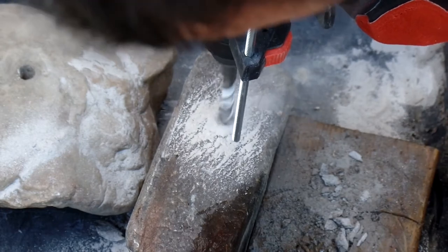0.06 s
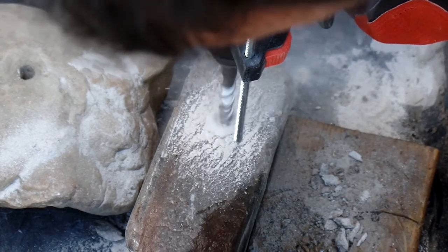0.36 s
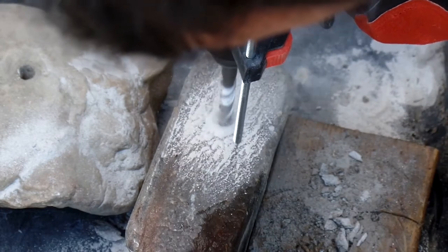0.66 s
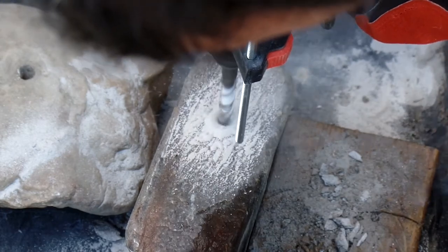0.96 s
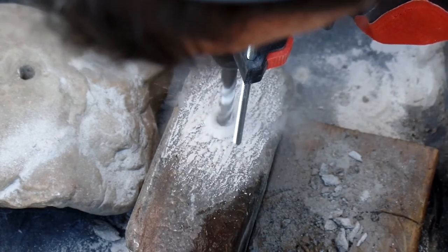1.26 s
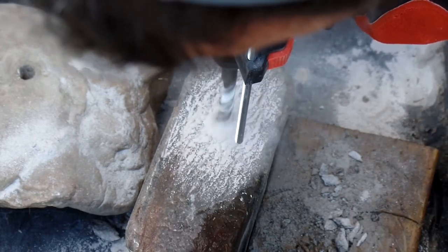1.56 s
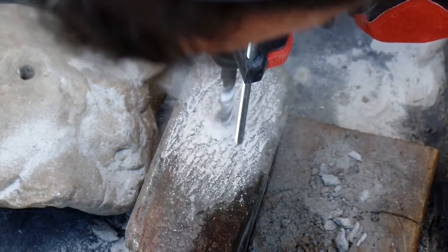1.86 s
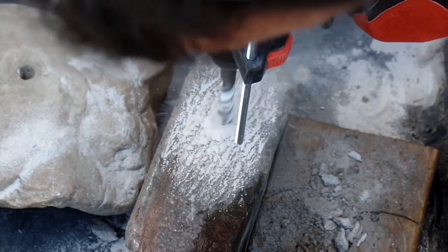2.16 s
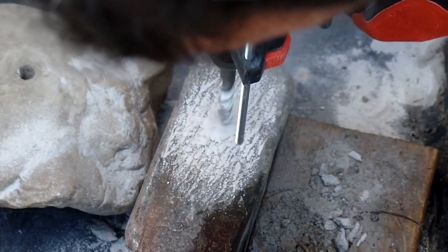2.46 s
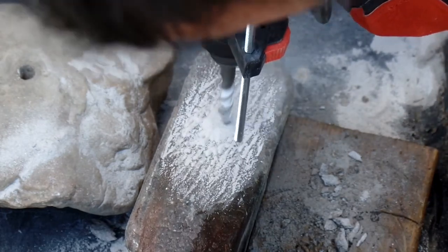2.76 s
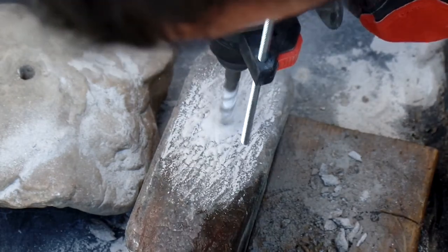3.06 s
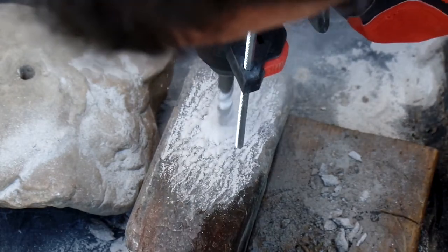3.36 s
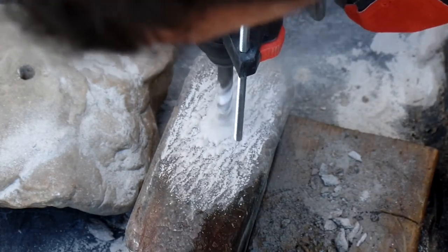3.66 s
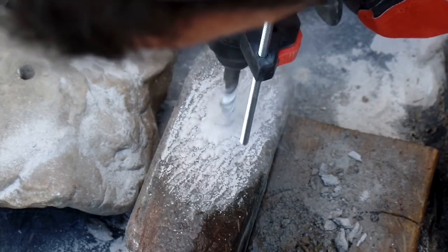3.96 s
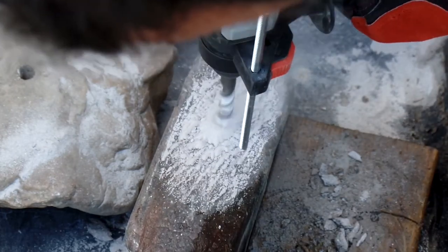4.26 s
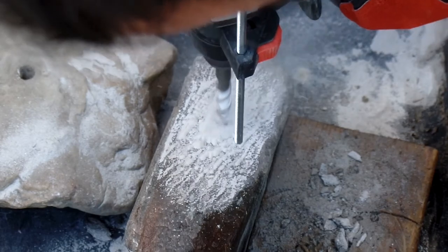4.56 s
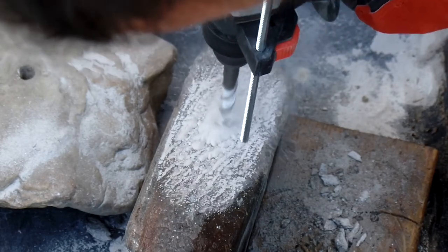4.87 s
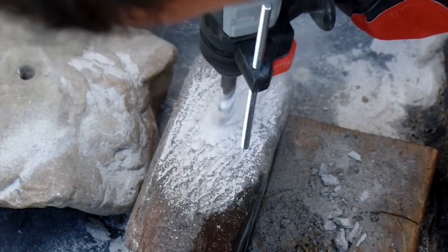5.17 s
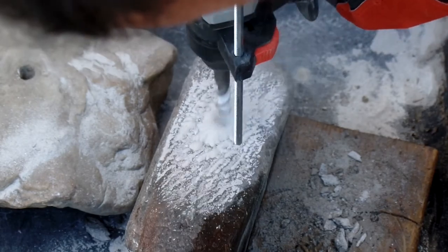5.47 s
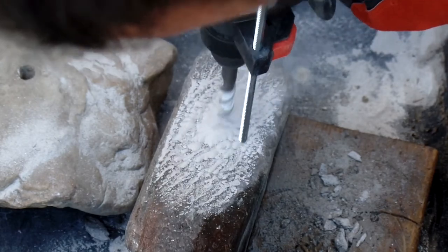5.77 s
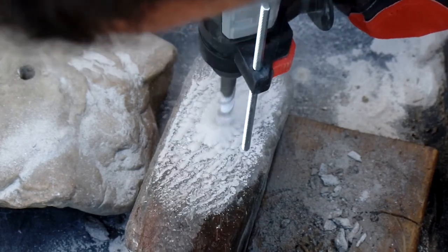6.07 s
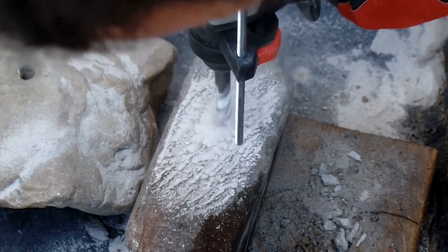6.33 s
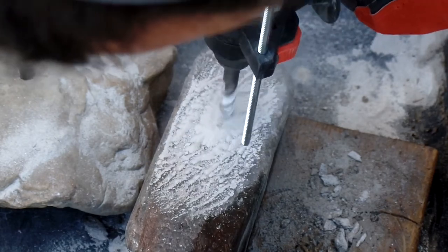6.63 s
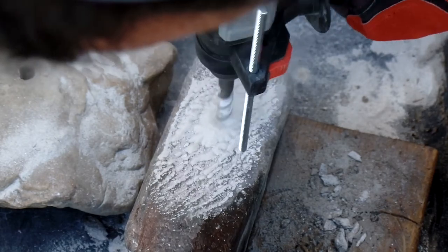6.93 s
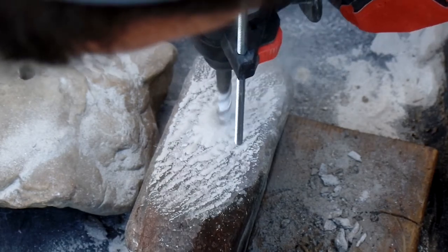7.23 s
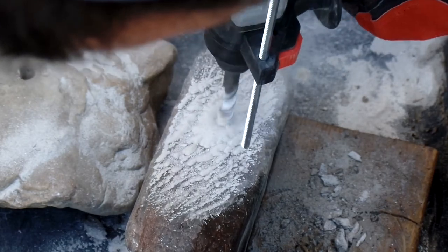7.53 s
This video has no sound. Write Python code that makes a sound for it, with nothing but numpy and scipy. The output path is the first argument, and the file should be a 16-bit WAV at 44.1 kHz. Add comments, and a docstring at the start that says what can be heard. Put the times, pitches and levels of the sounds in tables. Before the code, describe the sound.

A rotary hammer drill bores into a block of rock outdoors, close to the microphone. Very fast blows merge into a harsh, buzzing rattle, with a bright ring from the steel bit, gritty crushing of stone and a steady motor whine. The drilling softens briefly a few times as the tip slips and catches again. In the second half the whine swells and fades about once a second, and the drill never stops.

```python
"""Out of doors, close by, a rotary hammer drill bores into a block of rock.
The motor whines and drives a striker about 68 times a second; each impact excites the modes of rock
and housing, rings the steel bit and crushes stone. The flutes grind dust, and the blows soften
whenever the tip slips. Once the drill starts to rock in the hole, its whine swells and fades.
The blows leave a short, dull echo, and the air rumbles faintly beneath it all."""
import sys
import numpy as np
from scipy import signal
from scipy.fft import rfft, irfft, next_fast_len
from scipy.io import wavfile
from scipy.ndimage import uniform_filter1d

SR = 44100
rng = np.random.default_rng(int(sys.argv[2]) if len(sys.argv) > 2 else 0)


def wrap_up_sound(samples):
    """Save the sound to the file named by the first command line argument, as 16-bit audio."""
    columns = np.atleast_2d(samples).T
    # keep every value between -1 and 1, then stretch to whole-number steps
    tamed = np.clip(columns, -1, 1)
    steps = np.round(tamed * 32767).astype(np.int16)
    wavfile.write(sys.argv[1], SR, steps)


N = 335160
T = np.arange(N) / SR

# Motor speed, sagging under load. Each row: time in seconds, shaft speed in Hz.
SHAFT_SPEED = [(0.0, 367.4), (0.28, 369.9), (0.78, 365.2), (1.09, 368.4), (2.24, 365.3), (2.69, 366.1),
               (3.15, 370.3), (3.68, 366.8), (4.05, 371.8), (4.27, 368.6), (4.75, 369.5), (5.0, 373.8),
               (5.46, 369.2), (5.9, 374.6), (6.39, 370.2), (6.66, 372.6), (6.93, 371.2), (7.6, 374.1)]
# Weak motor harmonics. Each row: multiple of the shaft speed, level in dB.
HUM_HARMONICS = [(1, -92), (2, -62.5), (3, -76), (6, -63.5), (7, -63.5)]
# Modes of rock and housing. Each row: frequency in Hz, bandwidth in Hz, gain in dB.
BODY_MODES = [(135, 29, -23.5), (202, 52, -10), (338, 35, -35), (409.5, 28, -4.5), (468.7, 29, -0.5),
              (690, 50, 0.5), (816, 93, -1), (879, 64, 4), (956, 100, -8.5), (1178, 90, 4),
              (1314, 176, 2.5), (1465, 89, -3), (1768, 115, -1.5), (2074, 97, 3.5), (2560, 146, 1.5)]
# Modes of the steel bit. Each row: frequency in Hz, bandwidth in Hz, gain in dB,
# change once sunk in dB, spread between strokes in dB.
BIT_MODES = [(2780, 200, -6, 0, .4), (3300, 170, -8, 4, .5), (4180, 200, 1.2, 0, .4),
             (4700, 340, 1.3, 0, .4), (5560, 200, -13, -2, .6), (8260, 200, -8, 7.5, 2.8),
             (9100, 260, -12, -1, 1.5), (10000, 220, -5, -7, 1.5), (13200, 280, -11, 6, 2.2),
             (13850, 290, -7, 3, 2.2), (14850, 340, -9, -2, 1.8)]
# Stone crushed under the tip. Each row: frequency in Hz, relative spectral density in dB.
CRUSH_SPECTRUM = [(250, -19.5), (700, -13), (1500, -3), (2600, -3), (5000, 0.5), (6300, 1), (8000, 5.5),
                  (9500, -3), (12300, -1), (13600, 4), (15800, -9)]
# Fan, gears and dust in the flutes. Each row: frequency in Hz, relative spectral density in dB.
GRIND_SPECTRUM = [(50, -19.5), (250, -11), (450, -4), (750, -0.5), (1000, 1), (1400, 2.5), (1850, -1),
                  (2700, 2), (3700, 0), (5300, -2), (8000, -5.5), (10000, -11), (12300, -9), (13800, -17),
                  (15800, -7.5)]
# Outdoor air. Each row: frequency in Hz, relative spectral density in dB.
AIR_SPECTRUM = [(20, -22), (45, 6), (70, -15), (110, -10), (300, 8), (2000, -42)]
# The tip snags on hard grains. Each row: peak time in seconds, half-width in seconds, relative strength.
GRAIN_SNAGS = [(.3, .04, 1.0), (2.22, .02, 1), (2.94, 0.019, 1), (3.645, .015, 6), (3.865, 0.013, 3),
               (6.02, 0.018, 4.5), (6.6, .03, 1)]
# The tip loses its bite. Each row: slip time in seconds, catch time in seconds, drop of bite in dB.
TIP_SLIPS = [(0.0, .21, 2.5), (.395, 1.18, 3.8), (3.878, 4.3, 4.3), (4.85, 5.11, 4), (6.112, 6.49, 4)]

TURNS_PER_BLOW, FIRST_BLOW_CYCLES = 5.433, .48
BIT_TURN_HZ, SINK_S = 14.3, 5.5  # the bit's rotation, and its time to sink in
SLIP_S, REGAIN_S, CATCH_S = .02, .12, .04  # time to let go, to creep back, to catch
LOOSE_SHARE = .34  # part of the drop that stays until the tip catches
GEAR_DB, WHINE_DB = -55.5, -56.3  # at full bite, with the drill held still
ROCK_START_S, ROCK_GROW_S, ROCK_FACING_S, ROCK_PERIOD_S, ROCK_DB = 3.1, .9, 5.55, .91, 5


def undb(db):
    """Amplitude grows tenfold for every 20 dB."""
    return 10 ** (np.asarray(db) / 20)


def level(x, db=0):
    """Normalisation sets the rms level."""
    return x * undb(db) / np.sqrt(np.mean(x ** 2))


def drift(rate_hz):
    """Averaging random steps gives a smooth drift with a spread near 1."""
    hold = int(SR / rate_hz)
    steps = np.repeat(rng.standard_normal(N // hold + 1), hold)
    return 1.37 * uniform_filter1d(uniform_filter1d(steps, hold), hold)[:N]


def colour(x, points):
    """Filtering multiplies the spectrum by a curve of (Hz, dB) points."""
    hz, db = np.transpose(points)
    size = next_fast_len(N)
    bins_hz = np.maximum(np.fft.rfftfreq(size, 1 / SR), 1)
    return irfft(rfft(x, size) * undb(np.interp(np.log(bins_hz), np.log(hz), db)), size)[:N]


def ring(x, modes):
    """Modal superposition: the responses of (Hz, bandwidth, dB) resonators add."""
    return sum(undb(db) * signal.lfilter(*signal.iirpeak(hz, hz / width, fs=SR), x)
               for hz, width, db in modes)


def impulses(times, sizes):
    """Band-limited interpolation places each impulse at its exact time as a windowed sinc."""
    index = np.floor(times * SR).astype(int)[:, None] + np.arange(-5, 7)
    offset = index - times[:, None] * SR
    shape = np.sinc(offset) * np.cos(np.pi * offset / 12) ** 2
    inside = (index >= 0) & (index < N)
    return np.bincount(index[inside], (sizes[:, None] * shape)[inside], N)


def decay(x, seconds):
    """Exponential decay gives every impulse a tail."""
    return signal.lfilter([1], [1, -np.exp(-1 / (seconds * SR))], x)


def grit(spread_db):
    """Dense fractures of very unequal size make noise with a log-normal envelope."""
    noise = rng.standard_normal(N)
    sizes_db = spread_db * np.repeat(rng.standard_normal(N // 8 + 1), 8)[:N]
    return level(noise * undb(sizes_db))


def disperse(x):
    """Dispersion: short paths through bit and housing spread a shock over about a millisecond."""
    for lag in (3, 7, 11):
        allpass = np.r_[.55, np.zeros(lag - 1), 1]
        x = signal.lfilter(allpass, allpass[::-1], x)
    return x


def tip_bite_db():
    """Stick and slip: the bite drops at each slip, creeps back, and returns to 0 dB at the catch."""
    bite_db = 0
    for slip_s, catch_s, drop_db in TIP_SLIPS:
        loose = np.clip((T - slip_s) / SLIP_S + .5, 0, 1) * np.clip((catch_s - T) / CATCH_S + .5, 0, 1)
        fresh = np.exp(-((T - slip_s) / REGAIN_S) ** 2 / 2)
        bite_db -= drop_db * loose * (LOOSE_SHARE + (1 - LOOSE_SHARE) * fresh)
    return bite_db


def motor(shaft_hz, bite_db):
    """Rotation sounds harmonics of a trembling shaft speed; gear tone and armature whine grow with load."""
    angle = 2 * np.pi * np.cumsum(shaft_hz * (1 + .0015 * drift(90))) / SR
    hum = sum(level(np.sin(order * angle) * undb(2.9 * drift(25)), db) for order, db in HUM_HARMONICS)
    gear = level(np.sin(4 * angle) * undb(1.3 * drift(40)), GEAR_DB)
    whine = level(np.sin(16 * angle) * undb(2.4 * drift(140)), WHINE_DB)
    return hum + gear * undb(1.1 * bite_db) + whine * undb(.6 * bite_db + rocking_db())


def grinding(bite_db):
    """Flow and friction: cooling air, gears and dust in the flutes make noise that follows the bite."""
    rush = colour(grit(spread_db=2.5) * undb(1.2 * drift(250)), GRIND_SPECTRUM)
    return level(rush * undb(bite_db + .6 * snags() + .5 * drift(12)), -43.5)


def air():
    """Puffs of breeze modulate the amplitude of a faint rumble."""
    return level(colour(rng.standard_normal(N), AIR_SPECTRUM) * undb(5 * drift(20)), -82)


def hammer(shaft_hz, bite_db):
    """Impact excitation: each stroke is a blow and a rebound, and stone crumbles after both."""
    cycles = np.cumsum(shaft_hz) / SR / TURNS_PER_BLOW - FIRST_BLOW_CYCLES
    strokes = np.interp(np.arange(int(cycles[-1]) + 1), cycles, T)
    chance = rng.standard_normal((len(strokes), 5 + len(BIT_MODES))).T
    jitter, force, rebound_lag, rebound_force, breakage, *seating = chance
    times = strokes + .00004 * jitter
    # the cutting edges meet the rock better at one point of the bit's turn
    sizes = undb(.35 * force + .5 * np.sin(2 * np.pi * BIT_TURN_HZ * strokes))
    blow = impulses(times, sizes)
    rebound = impulses(times + .00145 + .00012 * rebound_lag, sizes * undb(.5 * rebound_force))
    crumble = decay(.74 * blow, seconds=.00061) + decay(.7 * rebound, seconds=.0037)
    crumble *= undb(1.2 * np.interp(T, strokes, breakage))
    return (stone_crush(crumble, bite_db) + body_knock(blow, crumble, bite_db)
            + steel_bit(.5 * blow + rebound, crumble, strokes, seating, bite_db))


def stone_crush(crumble, bite_db):
    """Brittle fracture under the tip radiates bursts of broadband noise."""
    fractures = crumble * grit(spread_db=2.5) * undb(.55 * snags())
    return level(colour(fractures, CRUSH_SPECTRUM), -46) * undb(bite_db)


def body_knock(blow, crumble, bite_db):
    """Rock and housing resonate at each blow; the knock carries little deep bass or treble."""
    drive = level(disperse(blow)) + level(crumble * grit(spread_db=4.5), -19)
    knock = colour(ring(drive, BODY_MODES), [(60, -11.5), (200, 0), (2800, 0), (7000, -2)])
    return level(knock * undb(.79 * bite_db), -48.5)


def steel_bit(shocks, crumble, strokes, seating, bite_db):
    """Contact sets each mode's share of the ringing: the tip reseats at every stroke, leans and sinks."""
    drive = level(disperse(shocks)) + level(crumble * grit(spread_db=1.5), -4)
    depth = np.minimum(T / SINK_S, 1)
    steel = 0
    for (hz, width, db, sink_db, spread_db), seat in zip(BIT_MODES, seating):
        seat_db = spread_db * (np.interp(T, strokes, seat) + .35 * drift(7.7))
        steel += undb(sink_db * depth + seat_db) * ring(drive, [(hz, width, db)])
    return level(steel, -43.5) * undb(bite_db)


def reflections(x, t60_s, wet_db):
    """Diffuse reflection from ground, slabs and nearby walls adds a short, dull echo."""
    t = T[:SR // 3]
    response = rng.standard_normal(len(t)) * undb(-60 * t / t60_s) * (t > .003)
    echo = signal.fftconvolve(x, response / np.linalg.norm(response))[:N]
    return x + undb(wet_db) * colour(echo, [(300, -9), (2500, -.5), (7000, -5), (14000, -22)])


def snags():
    """Friction on hard grains gives brief surges of scraping and crushing."""
    return sum(strength * np.exp(-((T - peak_s) / width_s) ** 2)
               for peak_s, width_s, strength in GRAIN_SNAGS)


def rocking_db():
    """Directivity: the rocking drill turns its whine toward and away from the listener."""
    growth = np.clip((T - ROCK_START_S) / ROCK_GROW_S, 0, 1)
    return ROCK_DB * growth * np.cos(2 * np.pi * (T - ROCK_FACING_S) / ROCK_PERIOD_S)


def scene():
    """Superposition: blows and motor tones, locked to one shaft, add to the grinding and the air."""
    shaft_hz = np.interp(T, *np.transpose(SHAFT_SPEED))
    bite_db = tip_bite_db()
    blows = reflections(hammer(shaft_hz, bite_db), t60_s=.16, wet_db=-15)
    return (blows + grinding(bite_db) + motor(shaft_hz, bite_db) + air())[None]


def record(dry):
    """Band limiting thins the bass below 35 Hz and cuts the treble above 15780 Hz."""
    thin = signal.sosfilt(signal.butter(1, 35, "high", fs=SR, output="sos"), dry)
    return signal.sosfilt(signal.ellip(12, .2, 75, 15780, fs=SR, output="sos"), thin)


dry = scene()
out = record(dry)
wrap_up_sound(out)
```